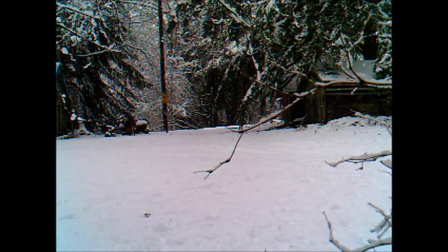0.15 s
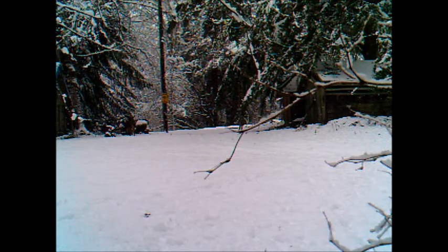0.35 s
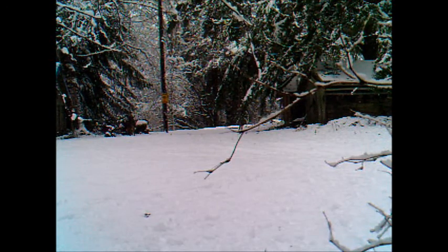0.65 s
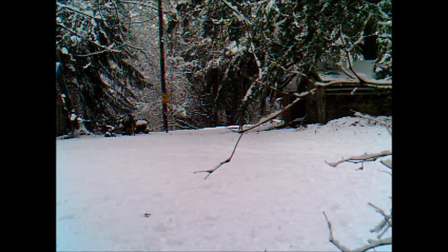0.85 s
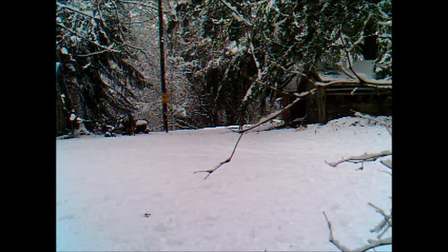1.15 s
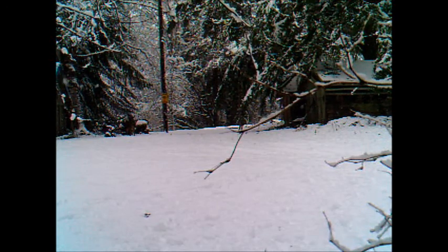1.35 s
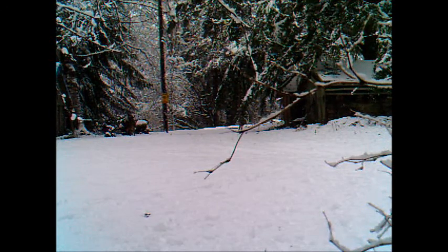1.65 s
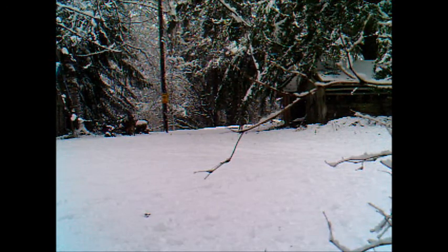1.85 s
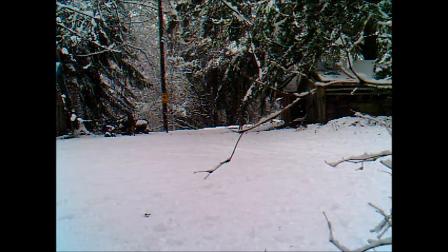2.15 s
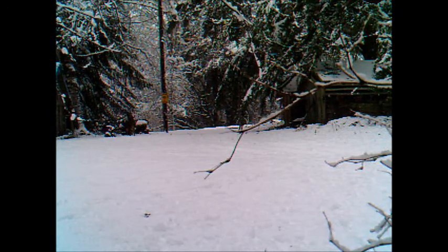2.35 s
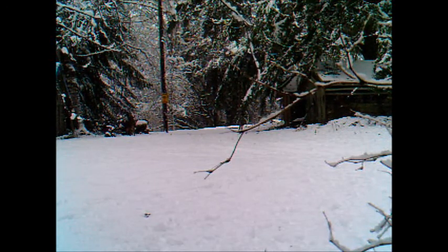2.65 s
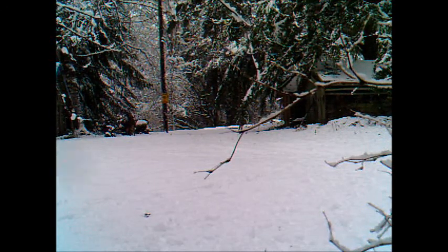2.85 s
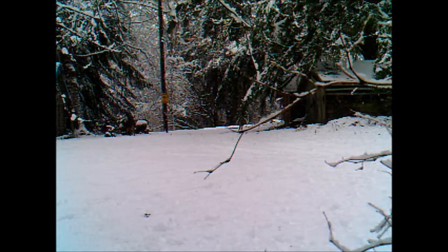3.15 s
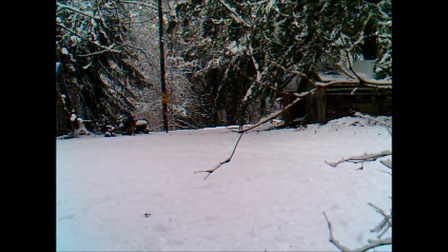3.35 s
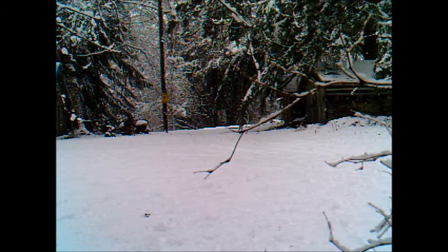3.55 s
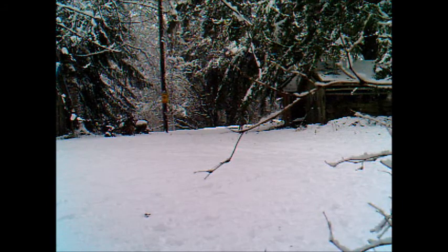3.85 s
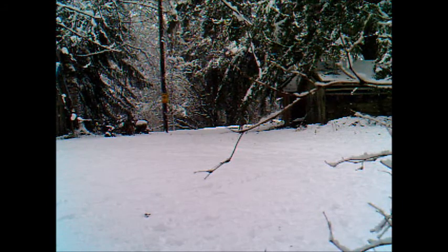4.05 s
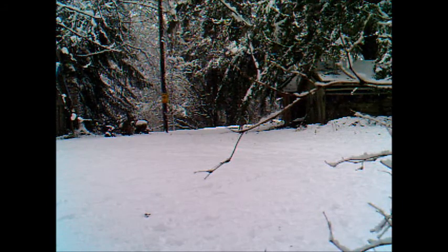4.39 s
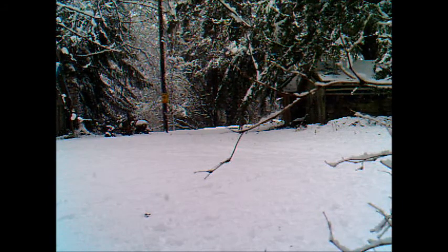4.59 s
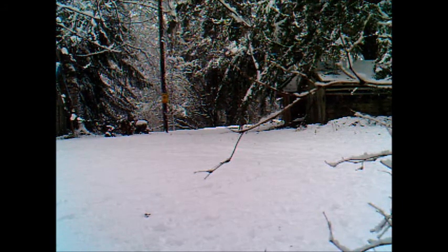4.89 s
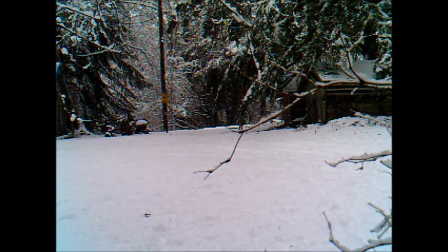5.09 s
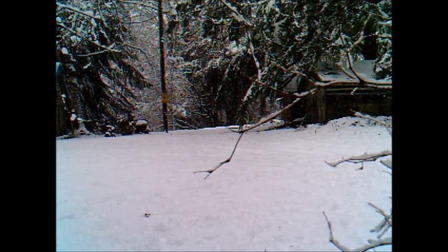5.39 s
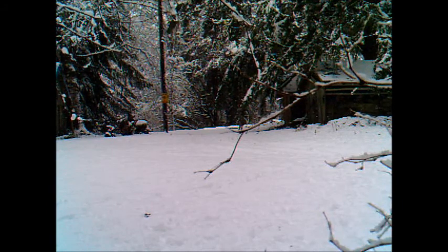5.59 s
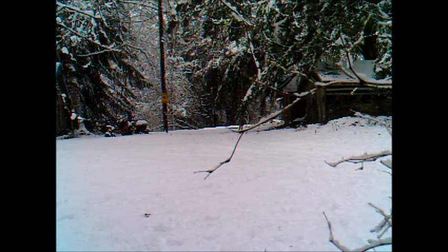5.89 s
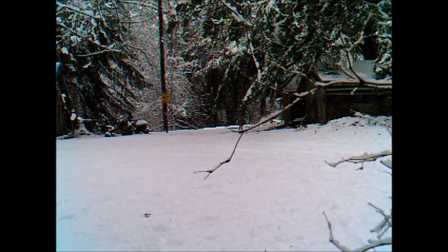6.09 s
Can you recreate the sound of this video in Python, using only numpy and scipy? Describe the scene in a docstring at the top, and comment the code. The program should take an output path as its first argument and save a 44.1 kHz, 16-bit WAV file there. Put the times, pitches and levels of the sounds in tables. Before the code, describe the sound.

In a quiet winter garden, a low electrical hum runs throughout, stumbling briefly now and then, over faint rumble and hiss. A few bits of ice tick on twigs at the start, then small clumps of snow drop through the branches and crumble into soft patters. Past the middle they thicken into one short flurry, and a last faint clump follows. A small microphone gives each contact a thin, high ring.

```python
"""A quiet winter garden. From the start a low electrical hum runs, stumbling now and then, over faint
rumble, the hiss of the electronics and a hush of sifting powder. A few bits of ice tick on twigs at once;
from 1 s on, snow clumps drop through the branches and crumble into patters. Ice and snow thicken into
one short flurry from 3.6 to 4.5 s, and a last clump falls at 5.4 s.
A small microphone rings near 3.3 kHz with every contact."""
import sys
import numpy as np
from scipy import signal
from scipy.fft import rfft, irfft, next_fast_len
from scipy.io import wavfile
from scipy.ndimage import uniform_filter1d

SR = 44100
rng = np.random.default_rng(int(sys.argv[2]) if len(sys.argv) > 2 else 0)


def generate_wav(signal):
    """Clip the signal to [-1, 1] and save it as 16-bit WAV at the path in sys.argv[1]."""
    frames = np.transpose(np.atleast_2d(signal))
    scaled = np.clip(frames, -1, 1) * 32767
    pcm = np.round(scaled).astype(np.int16)
    wavfile.write(sys.argv[1], SR, pcm)


N = 274743
T = np.arange(N) / SR


def undb(db):
    """Decibels to gain."""
    return 10 ** (np.asarray(db) / 20)


def level(x, db):
    """Scale to an rms level."""
    return x * undb(db) / np.sqrt(np.mean(x ** 2))


def drift(rate_hz):
    """Smooth random drift with a spread near 1."""
    span = int(SR / rate_hz)
    steps = np.repeat(rng.standard_normal(N // span + 2), span)
    return 1.2 * uniform_filter1d(steps, span)[span // 2:span // 2 + N]


def noise(spectrum):
    """Noise coloured by a curve of (Hz, dB) points."""
    hz, db = np.transpose(spectrum)
    size = next_fast_len(N)
    bins_hz = np.maximum(np.fft.rfftfreq(size, 1 / SR), 1)
    colour = undb(np.interp(np.log(bins_hz), np.log(hz), db))
    return irfft(rfft(rng.standard_normal(size)) * colour, size)[:N]


def resonate(x, hz, width_hz):
    """One resonance, gain 1 at its centre."""
    return signal.lfilter(*signal.iirpeak(hz, hz / width_hz, fs=SR), x)


def grains(size, per_s, spread_db):
    """Random tiny contacts, most weak and a few strong."""
    hit = rng.random(size) < per_s / SR
    strength = undb(spread_db * np.minimum(rng.exponential(size=size), 4))
    return hit * strength * rng.choice([-1, 1], size)


def place(out, start_s, sound, peak_db):
    """Mix in a sound at a time and a peak level."""
    i = int(start_s * SR)
    out[i:i + len(sound)] += (sound * undb(peak_db) / (np.abs(sound).max() + 1e-12))[:N - i]


# The tone curves of the rumble and the hiss. Each row: frequency in Hz, relative level in dB.
RUMBLE_CURVE = [(15, -6.5), (35, -9), (55, -7), (80, -9), (105, -16), (135, -19.5), (210, -23),
                (290, -22.5), (360, -30), (520, -29.5), (750, -39.5), (1500, -54)]
HISS_CURVE = [(100, 4), (700, 1), (1200, 1.04), (2200, -0.9), (3300, -7.5), (4500, -8), (6000, -8),
              (8000, -8), (9800, -8.5), (10500, -17), (11000, -54)]
# Thin electrical whines. Each row: pitch in Hz, rms level in dB.
WHINE_TONES = [(480, -67.5), (531, -66.5), (625, -73), (3120, -69), (3400, -67), (4800, -73.5), (5600, -78),
               (7400, -81), (9600, -88)]
def noise_floor(rumble_db=-39, hiss_db=-51):
    """The bed: a gently wavering rumble, with even hiss and steady whines from the electronics."""
    rumble = noise(RUMBLE_CURVE) * undb(0.61 * drift(6.4))
    whines = sum(undb(db) * np.sqrt(2) * np.sin(2 * np.pi * hz * T) for hz, db in WHINE_TONES)
    return level(rumble, rumble_db) + level(noise(HISS_CURVE), hiss_db) + whines


# The hum's harmonics. Each row: multiple of the pitch, level in dB relative to the fundamental.
HUM_HARMONICS = [(1, 0), (2, -12.5), (3, -33), (4, -23), (5, -27.5), (6, -31.5), (7, -46.5), (8, -38.5),
                 (9, -39), (10, -36.5)]
def hum(pitch_hz=31.25, tone_db=-22.96, jitter_cycles=0.014, flutter_db=2, rasp_db=-56, sputter_db=-40):
    """A rounded sawtooth in the supply; when it stumbles it lags, sags and sputters."""
    lag_cycles, gain, upset = stumbles()
    phase = 2 * np.pi * (pitch_hz * T - lag_cycles + jitter_cycles * drift(25))
    tone = np.zeros(N)
    for k, db in HUM_HARMONICS:
        flutter = flutter_db * min((k - 1) / 4, 1) * drift(18)  # the upper harmonics flutter most
        shift = np.pi / 4 if k <= 2 else 0
        tone += undb(db + flutter) * np.cos(k * phase + shift)
    # a soft rasp once a cycle, near the crest of the wave
    rasp = rng.standard_normal(N) * np.exp(2 * np.cos(phase + np.pi / 4))
    rasp = resonate(resonate(rasp, 285, 130), 285, 260)
    sputter = resonate(resonate(rng.standard_normal(N), 65, 55), 72, 67)
    return (level(tone, tone_db) + level(rasp, rasp_db)) * gain + upset * level(sputter, sputter_db)


# The hum cuts out for an instant. Each entry: centre of the gap in seconds.
HUM_GAPS = [0.117, 1.356, 2.665, 4.142, 5.582]
def stumbles(first_sag_s=1.185, sag_every_s=1.007, sag_half_s=0.0418, gap_half_s=0.014):
    """The hum's lag, gain and sputter strength: one long sag, then one about every second, plus gaps."""
    sags = [(0.288, 0.0985)]  # the long sag: centre and half length in seconds
    sags += [(s, sag_half_s) for s in np.arange(first_sag_s, T[-1], sag_every_s)]
    # the longer a sag, the further it lags and the deeper it dips
    dips = [(s, half_s, 4.7 * half_s, 6.2 * half_s) for s, half_s in sags]
    dips += [(s, gap_half_s, 0, 1) for s in HUM_GAPS]
    lag_cycles, gain, upset = np.zeros(N), np.ones(N), np.zeros(N)
    for centre_s, half_s, cycles, depth in dips:
        bump = np.exp(-((T - centre_s) / half_s) ** 2)
        lag_cycles += cycles * bump
        gain *= 1 - depth * bump
        upset += bump
    return lag_cycles, gain, upset


def sifting(hush_db=-54.5, calm_db=-67, shaken_db=-52, settle_s=2.05):
    """Far trees shed powder as a smooth hush; nearer specks patter on their own."""
    hush = resonate(microphone(rng.standard_normal(N)), 3100, 3300) * undb(0.1 * drift(4.95))
    specks = resonate(microphone(grains(N, per_s=400, spread_db=2.7)), 3000, 4500)
    # each fall shakes powder loose in step with its size, and the powder slowly settles
    powder = sum(undb(db) * (T > s) * np.exp(-np.abs(T - s) / settle_s)
                 for s, db, _ in ICE_HITS + SNOW_CLUMPS)
    speck_gain = np.sqrt(undb(calm_db) ** 2 + undb(shaken_db) ** 2 * powder)
    return level(hush, hush_db) + level(specks, 0) * speck_gain


# The microphone's ring. Each row: centre in Hz, width in Hz, gain in dB.
MIC_RESONANCES = [(3300, 605, 11.5), (4930, 1600, -9.5), (6630, 1800, -23), (8150, 1100, -10)]
def microphone(x):
    """The capsule rings briefly at its resonances."""
    return sum(undb(db) * resonate(x, hz, width_hz) for hz, width_hz, db in MIC_RESONANCES)


def twig(force, hz, width_hz, cut_hz):
    """A damped twig; being thin, it radiates almost nothing below its ring."""
    low_cut = signal.butter(4, cut_hz, "high", fs=SR, output="sos")
    return signal.sosfilt(low_cut, resonate(force, hz, width_hz))


# Ice ticking on twigs. Each row: start in seconds, peak level in dB, ring pitch in Hz.
ICE_HITS = [(.042, -33, 3480), (0.083, -27, 3460), (0.085, -28, 3260), (.149, -37, 3500), (.204, -38, 3680),
            (1.489, -32, 3300), (1.49, -33, 4750), (2.926, -26.5, 3400), (3.037, -30, 2800),
            (3.583, -23, 3320), (3.8357, -27, 3070), (3.9187, -27.5, 3300), (3.9775, -18, 3440),
            (4.028, -26, 3370), (4.04, -27.5, 3800), (4.0526, -19.5, 3300), (4.2186, -33, 3340),
            (4.3121, -21, 3360), (4.347, -31.5, 4930), (4.3986, -10.5, 3300)]
def ice(light_db=-30, light_width_hz=690, crumb_s=0.0034, contact_s=0.00006):
    """Ice strikes a twig: a light piece lets it ring and crumbles, a heavy one damps it and stays whole."""
    out, t = np.zeros(N), T[:SR // 25]
    for start_s, db, hz in ICE_HITS:
        weight_db = db - light_db
        width_hz = light_width_hz * 2 ** (weight_db / 15)
        crumb_share = 0.33 / 2 ** (weight_db / 20)
        force = grains(len(t), per_s=4100, spread_db=1.6)
        force *= np.exp(-t / crumb_s) * (1 - np.exp(-3 * t / crumb_s))
        force *= crumb_share / (np.linalg.norm(force) + 1e-9)
        force[0] = 1  # the strike itself, ahead of its crumbs
        # heavier pieces push longer and sound rounder
        push = signal.windows.gaussian(16, contact_s * SR * np.exp(0.091 * (db + 10)))
        cut_hz = max(hz - 0.62 * width_hz, 1800)  # a well damped twig reaches further below its ring
        tick = twig(np.convolve(force, push), hz, width_hz, cut_hz)
        place(out, start_s, microphone(tick), db)
    return out


# Snow clumps bursting on needles. Each row: start in seconds, peak level in dB, crumble time in seconds.
SNOW_CLUMPS = [(1.003, -41, .0015), (1.49, -35.5, .008), (2.52, -34.5, 0.012), (2.777, -32, .005),
               (2.989, -36.5, 0.0077), (3.028, -33, .011), (3.579, -27.5, 0.0054), (3.816, -31.5, 0.016),
               (3.92, -30, 0.021), (4.034, -25.5, 0.0038), (4.309, -30.5, 0.0029), (4.386, -29.5, 0.0094),
               (4.538, -36, 0.013), (5.412, -38, 0.015)]
def snow_clumps(rise_s=0.0016, big_crumble_s=0.016):
    """A soft clump breaks up into a dense, dying shower of grains with a faint broad crunch."""
    out, t = np.zeros(N), T[:SR // 12]
    for start_s, db, crumble_s in SNOW_CLUMPS:
        force = grains(len(t), per_s=7000, spread_db=2.8)
        force *= (1 - np.exp(-t / rise_s)) * np.exp(-t / crumble_s)
        patter = microphone(twig(force, hz=3500, width_hz=5000, cut_hz=2300))
        crunch = undb(-19) * resonate(force, 2300, 9000)
        # big, slowly crumbling clumps also land with a dull puff
        puff = undb(-3) * (crumble_s / big_crumble_s) ** 2 * resonate(force, 900, 1500)
        place(out, start_s, patter + crunch + puff, db)
    return out


def scene():
    """Falling ice and snow over the hum and the noise floor, in mono."""
    return (ice() + snow_clumps() + sifting() + hum() + noise_floor())[None]


def record(dry):
    """The recorder cuts the top steeply; its converter sits slightly off zero."""
    top_hz, dc_offset = 10750, -0.02
    high_cut = signal.ellip(10, 0.2, 80, top_hz, fs=SR, output="sos")
    return signal.sosfilt(high_cut, dry) + dc_offset


dry = scene()
out = record(dry)
generate_wav(out)
```